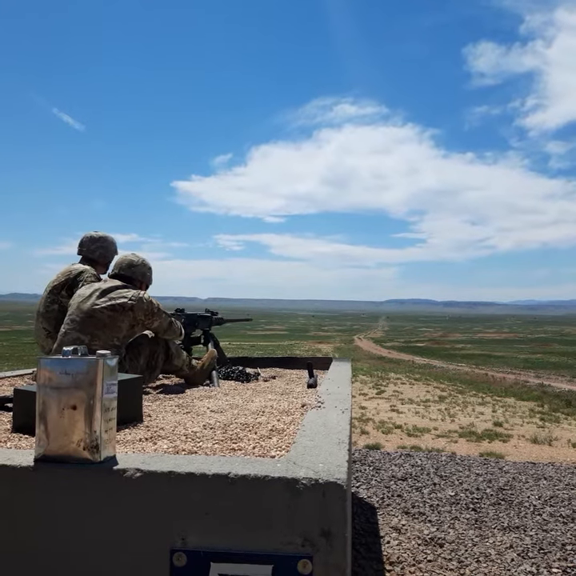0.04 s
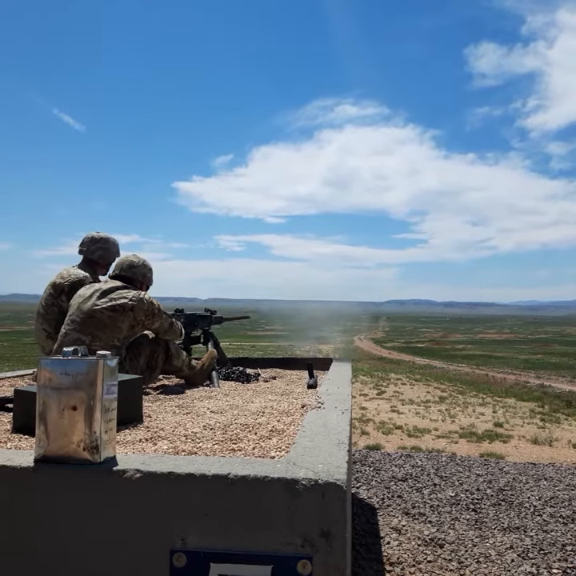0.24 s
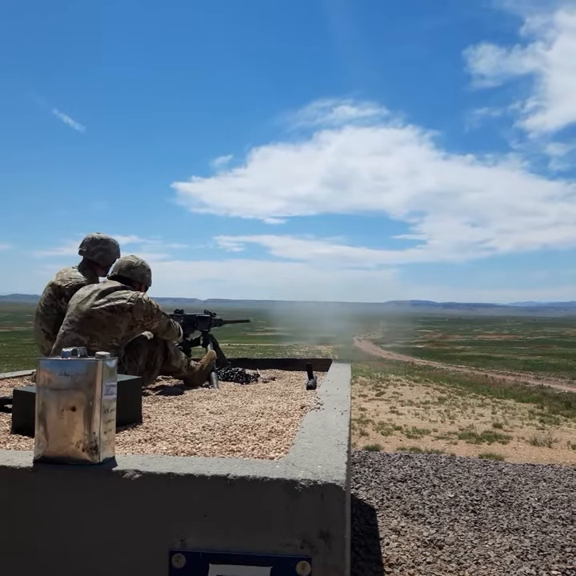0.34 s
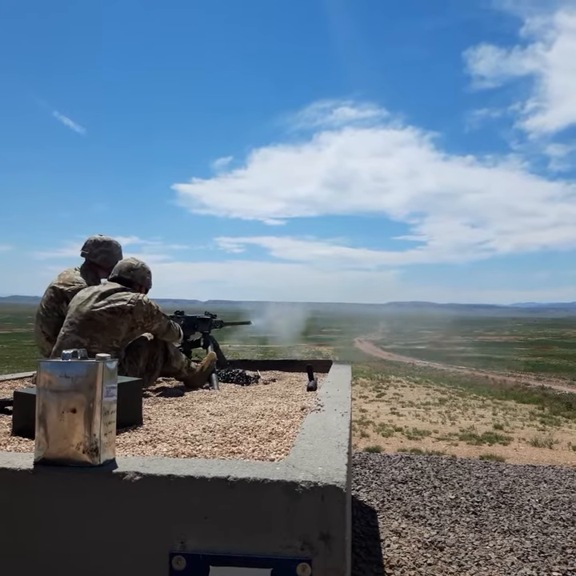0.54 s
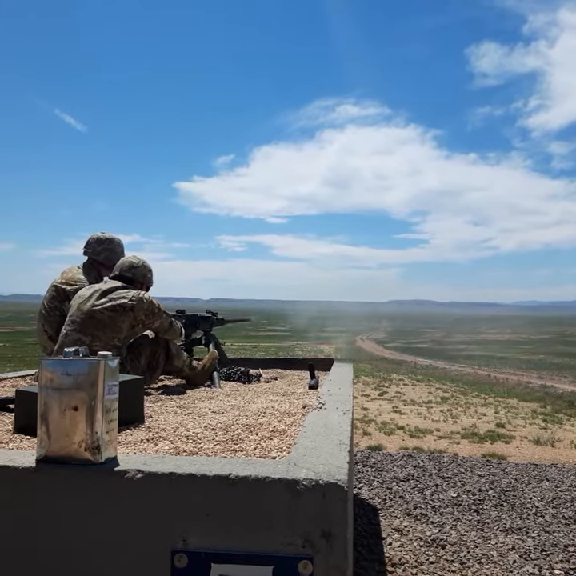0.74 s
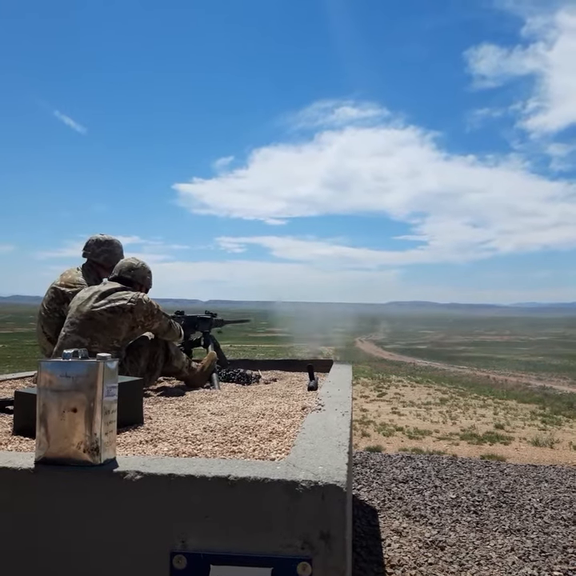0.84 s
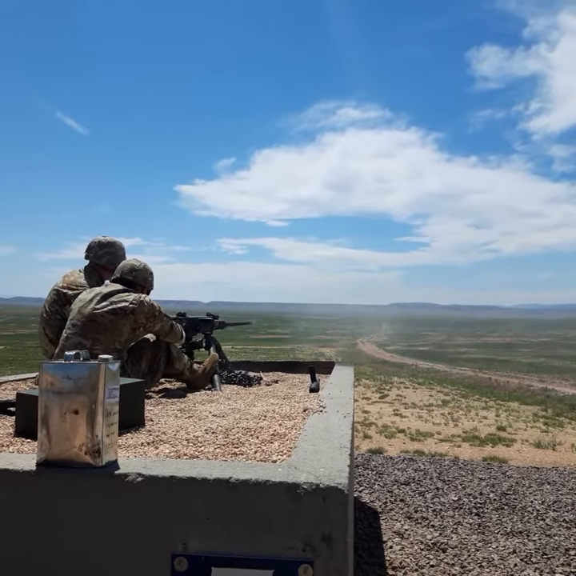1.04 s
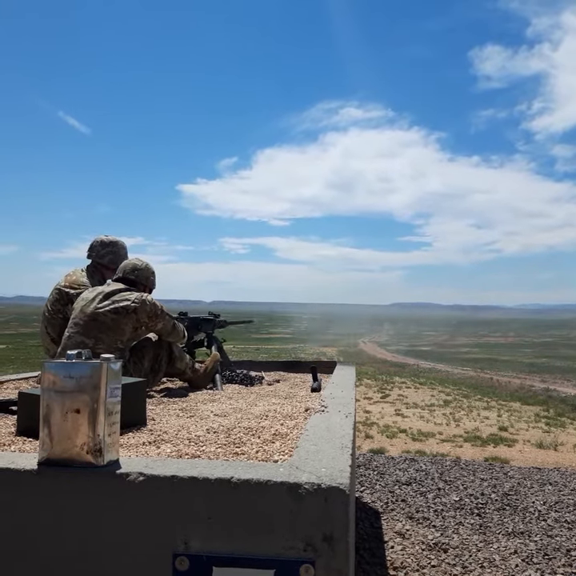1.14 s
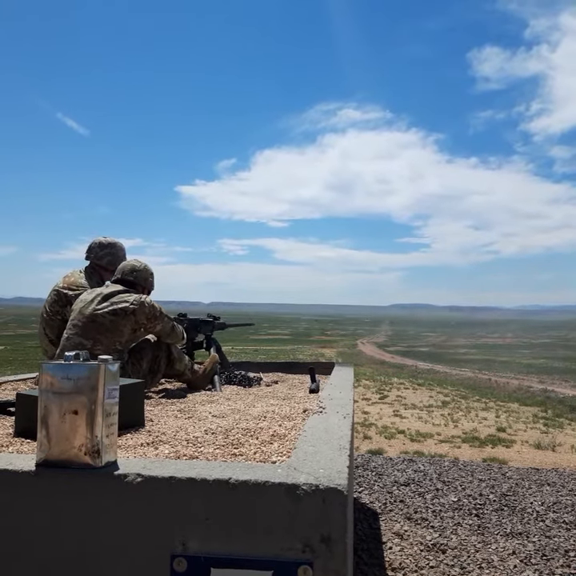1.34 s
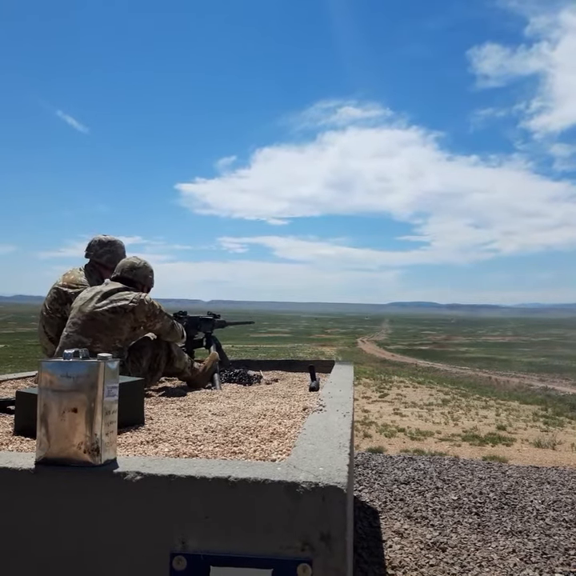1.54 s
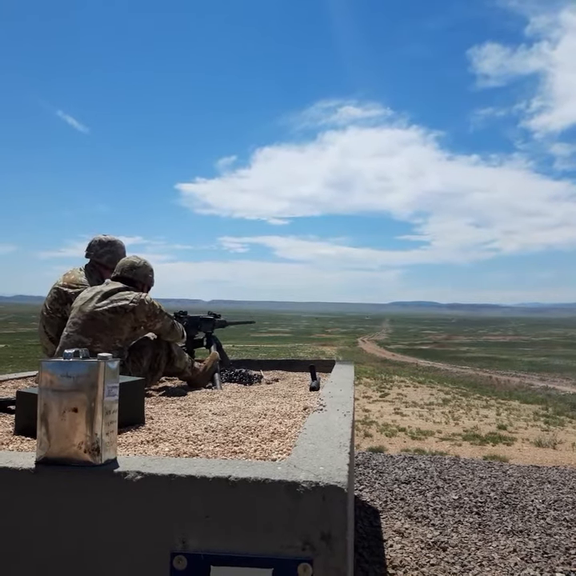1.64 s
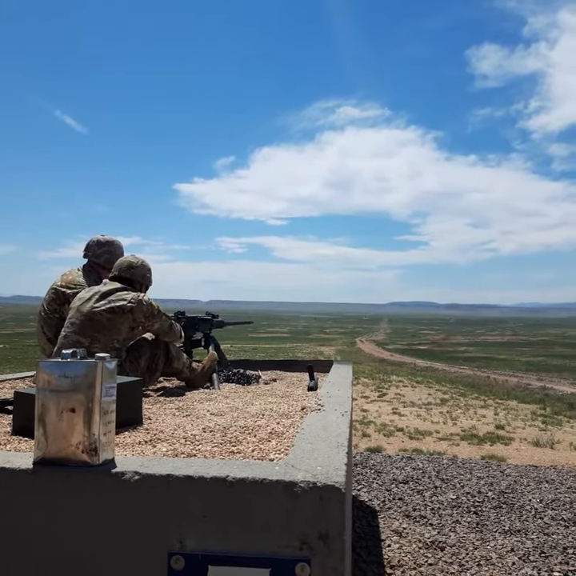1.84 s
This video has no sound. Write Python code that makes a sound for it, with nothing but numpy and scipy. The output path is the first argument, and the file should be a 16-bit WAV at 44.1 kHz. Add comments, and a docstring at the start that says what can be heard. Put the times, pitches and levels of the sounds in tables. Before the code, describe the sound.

A heavy machine gun on a concrete platform, close and loud outdoors. Faint low rumble and dull distant reports open the first 0.15 seconds. From 0.2 to 1.1 seconds, eight harsh, squashed blasts come about every 0.13 seconds, with metallic ringing and thumping echoes. A sharp action clack follows at 1.22, faint cases tinkle around 1.3 to 1.6, and the low roll fades over the plain.

```python
"""A low rumble over an open range, with dull reports from distant firing points, comes first.
Then a heavy machine gun fires eight rounds from a concrete platform: N-shaped shock fronts with
noise crashes, a clatter off the platform and a roll over the plain; metal modes ring, the bolt clacks.
Delayed pressure waves return as thumps from nearby structures, and cases and links tinkle down.
The stereo microphone signal is limited, its peaks are rounded and its top is cut."""
import sys
import numpy as np
from scipy import signal
from scipy.fft import rfft, irfft
from scipy.io import wavfile
from scipy.ndimage import uniform_filter1d, minimum_filter1d

SR = 44100
rng = np.random.default_rng(int(sys.argv[2]) if len(sys.argv) > 2 else 0)


def wav_out(sig):
    """Save sig, one row per channel (or a flat mono array), as 16-bit PCM at SR to the path in sys.argv[1]."""
    wavfile.write(sys.argv[1], SR, np.round(np.clip(np.atleast_2d(sig).T, -1, 1) * 32767).astype(np.int16))


N = 83790
T = np.arange(N) / SR  # s

# Distance: air over the range, noise colour [f/Hz, relative level/dB per Hz]
AIR_COLOUR = [(30, -25.5), (90, -3), (150, 9), (330, 1.5), (600, -13.5), (1400, -14.5), (2500, -23),
              (4000, -32.5), (15000, -41.5)]
AIR_BEFORE_DB, AIR_AFTER_DB = -49.5, -57.5
# Distance: reports from other firing points [t/s, level/dB]
FAR_REPORTS = [(.012, -33.5), (.078, -40), (.108, -27.5), (.128, -35), (1.868, -49)]
FAR_WAVE_MS, FAR_DULL_HZ = 2.63, 494

# Close: rounds of the gun [t/s, crash level/dB, clatter level/dB], levels on top of the layer levels
ROUNDS = [(.2052, 2.5, 4.5), (.3241, 0, 2.5), (.4399, 2, 3.5), (.5642, 1.5, 1.5), (.6893, 5, -1.5),
          (.8257, 3, -1), (.959, -2.5, -1.5), (1.0918, 5.5, -2.5)]
BOLT_LEAD_S, BOLT_DB, BOLT_DECAY_S = 0.0034, -21, .005  # the bolt closes just before each round
FRONT_DB, FRONT_MS, FRONT_DULL_HZ = 4, 0.6, 8200  # the direct shock front
# Close: harsh crash of the muzzle blast [f/Hz, relative level/dB per Hz, t60/s]
CRASH_COLOUR = [(60, -26.5, 0.18), (150, -13, .15), (268, -3.5, 0.19), (700, -3.5, 0.1), (1550, -5.5, 0.13),
                (2800, -1, 0.11), (5000, -2.5, 0.087), (7930, -3.5, 0.092), (9534, -13, 0.091),
                (15000, -9.5, 0.064)]
CRASH_DB, CRASH_ATTACK_S, CRASH_HOLD_S = 2, 0.000067, .005
# Close: clatter off the platform [f/Hz, relative level/dB per Hz, t60/s]
CLATTER_COLOUR = [(101, -21, 0.19), (505, 6, 0.18), (980, -1, 0.29), (1700, -5, .28), (2500, 1.5, 0.52),
                  (4570, -6, 0.6), (7600, -7, 0.52), (9900, -17.5, 0.16), (15000, -20, 0.17)]
CLATTER_DB, CLATTER_ATTACK_S, CLATTER_HOLD_S = -16, 0.013, 0.043
# Open ground: roll away over the plain [f/Hz, relative level/dB per Hz, t60/s]
ROLL_COLOUR = [(30.3, -29.5, 0.69), (67.7, -14, .9), (129, -12, 1), (240.7, 2, 0.8), (418, 2, 0.52),
               (602.6, -13, 1), (990, -19.5, 1), (2550, -18.5, 0.89), (4500, -30.5, 0.77),
               (15000, -65, 0.24)]
ROLL_DB, ROLL_ATTACK_S, ROLL_HOLD_S = -16.5, 0.016, 0.045
SAME_SHARE = 0.36  # share of the scatter's power that repeats from round to round
PATCHY_DB, PATCH_HZ = 1.5, 129  # reflections colour the scatter unevenly
GRAIN_DB, GRAIN_S = 3, 0.00078  # and make it crackle
# Close: bright spray of the bolt, the clacks, the ticks and the echoes [f/Hz, relative level/dB per Hz]
SPRAY_COLOUR = [(100, -25), (600, -1), (1300, -3.5), (2400, 5), (4500, -3.5), (8000, -5.5), (10000, -16.5),
                (15000, -15)]

# Close: ringing modes of the gun's body [f/Hz, level/dB, t60/s]
BODY_MODES = [(1315, 4.5, 0.18), (1820, 0, .25), (2240, -5, 0.4), (2620, 2, 0.35), (2910, -6, 0.1),
              (3800, -3, .3), (3870, 3, 0.25), (5173, 1, .2)]
BODY_DB = -20.5
# Close: clacks as the action settles [t/s, level/dB, decay to 1/e/s]
ACTION_CLACKS = [(1.223, -15.5, 0.0061), (1.413, -36, 0.0029), (1.457, -38.5, 0.0036)]
# On the ground: cases and links land [t/s, level/dB]
LANDINGS = [(1.275, -44.5), (1.352, -50.5), (1.497, -53.5)]
# On the ground: ringing modes of the cases and links [f/Hz, level/dB, t60/s]
BRASS_MODES = [(5722, -8.5, 0.52), (6140, -2, 0.2), (6470, -1, 0.22), (6750, -6.5, 0.17),
               (7327, -5.5, 0.52), (7600, -10.5, 0.61), (8140, -17, .35), (8839, -7.5, 0.28),
               (10800, -13, .4), (11300, -10, .3), (12800, -11, 0.46), (13900, -6, 0.37), (15070, -10, .3)]
BOUNCES, BOUNCE_GAP_S, BOUNCE_LOSS_DB = 4, (.01008, .0588), 3
TICK_DB, TICK_DECAY_S = 11, 0.0023  # contact tick, level above the landing's

# Nearby structures: return paths of every blast [delay t/s, thump level/dB, wave length/ms,
# dull above f/Hz, spray level/dB, spray decay to 1/e/s, lag of left behind right/ms]
RETURN_PATHS = [(.0441, 8.5, 2.5, 1000, -22, .004, 0.32), (.0512, 3, 3.6, 650, -28.5, .004, 0.29),
                (.0860, 0, 1.61, 1300, -10, .008, -0.15), (.0908, -3.5, 2.0, 1000, -19, .004, 0.38),
                (.0975, 4, 3.01, 700, -33, .005, 0.33), (.1375, -0.5, 2.4, 700, -25, .006, 0.13),
                (0.141, -5.5, 2.4, 700, -42, 0.0043, -0.05), (.1835, -3.5, 1.6, 680, -20, .004, 0.079),
                (0.272, -24.5, 1.1, 1200, -37.5, .004, 0), (.3120, -21, 1.5, 800, -46, .004, 0),
                (.3800, -17.5, 4.5, 280, -65.5, .005, 0.095), (.4030, -22, .8, 1200, -52, .005, 0),
                (.4180, -29, 2.7, 450, -71.5, .005, -0.052), (.5495, -17.5, 3.0, 330, -43.5, .007, 0.045),
                (.6090, -28, 3, 350, -82.5, .005, 0), (.6670, -46.5, 1.9, 400, -92.5, .005, -0.042)]
SPRAY_HZ_AT_1_S = 1400  # treble limit of an echo spray delayed by one second

# Microphone: left-right likeness of noise [f/Hz, correlation from -1 to 1]
LIKENESS_CURVE = [(100, 0.78), (280, 0.68), (550, 0.61), (1000, -0.35), (2200, 0.18), (5000, 0.14),
                  (12000, 0.13)]
# Microphone: balance of noise [f/Hz, left minus right level/dB]
BALANCE_CURVE = [(200, 2), (1000, -0.5), (3500, -2), (8000, -2), (13000, 2)]
LOW_CUT_HZ, BASS_LEAK_DB = 206, -16
BASS_HZ = 73.8  # the deep after-swing of each wave
LIMIT_DB, RELEASE_DB_PER_S, LIMIT_ATTACK_S = 2.44, 449, 0.00061
CEILING, TOP_CUT_HZ = 1.4, 15800  # ceiling as amplitude


def from_db(db):
    """Decibels to amplitude gain."""
    return 10 ** (np.asarray(db) / 20)


def at_hz(table, hz, axis=1):
    """Read a column of a table on a log-frequency axis."""
    table = np.array(table)
    return np.interp(np.log(hz + 1e-9), np.log(table[:, 0]), table[:, axis])


def butter(x, hz, kind, order=2):
    """Causal low- or high-pass."""
    sos = signal.butter(order, min(hz, SR * .45), kind, fs=SR, output="sos")
    return signal.sosfilt(sos, x + 1e-18)


def add(out, s, x):
    """Mix a sound in at time s, cut off at the end of the scene."""
    i = max(int(s * SR), 0)
    n = min(x.shape[-1], N - i)
    out[:, i:i + n] += x[..., :n]


def wander(x, step):
    """A random curve with a new value at every step of x, straight in between."""
    return np.interp(x / step, np.arange(4096), rng.standard_normal(4096))


def noise(colour, size, patchy_db=0, grain_db=0):
    """Coloured stereo noise of rms 1, alike in the bass and wide in the treble."""
    hz = np.fft.rfftfreq(size, 1 / SR)
    grain = from_db(grain_db * wander(T[:size], GRAIN_S))
    mid, side = rfft(rng.standard_normal((2, size)) * grain)
    alike = at_hz(LIKENESS_CURVE, hz)
    left_right = np.array([[1], [-1]])
    balance_db = left_right * at_hz(BALANCE_CURVE, hz) / 2
    gain = from_db(at_hz(colour, hz) + balance_db + patchy_db * wander(hz, PATCH_HZ))
    spectrum = np.sqrt(1 + alike) * mid + left_right * np.sqrt(1 - alike) * side
    x = irfft(gain * spectrum, size)
    return x / x.std()


def air():
    """A steady low rumble that falls in level while the gun fires."""
    level_db = np.interp(T, [ROUNDS[0][0], ROUNDS[-1][0]], [AIR_BEFORE_DB, AIR_AFTER_DB])
    return noise(AIR_COLOUR, size=N) * from_db(level_db)


def blast(ms, dull_hz, lag_ms=0):
    """An N-shaped pressure wave, dulled by its path, ringing in the microphone's low cut."""
    late_ms = np.maximum([[lag_ms], [-lag_ms]], 0)  # a negative lag delays the right side
    u = (T[:4096] * 1000 - late_ms) / ms
    n_wave = (1 - 2 * u) * ((u >= 0) & (u < 1))
    wave = butter(n_wave, dull_hz, "low", order=3)
    after_swing = butter(butter(wave, BASS_HZ, "low"), BASS_HZ, "high")
    return butter(wave, LOW_CUT_HZ, "high", order=4) + from_db(BASS_LEAK_DB) * after_swing


def far_reports():
    """Distant firing points: pressure waves with little treble left."""
    out = np.zeros((2, N))
    for s, db in FAR_REPORTS:
        add(out, s, from_db(db) * blast(FAR_WAVE_MS, FAR_DULL_HZ))
    return out


def burst(db, decay):
    """A short bright spray of noise that dies exponentially."""
    x = noise(SPRAY_COLOUR, size=4096)
    return from_db(db) * x * np.exp(-T[:x.shape[1]] / decay)


def bolt():
    """The bolt closes as a short spray of noise just before each round."""
    out = np.zeros((2, N))
    for s, _, _ in ROUNDS:
        add(out, s - BOLT_LEAD_S, burst(BOLT_DB, BOLT_DECAY_S))
    return out


def scatter(colour, attack, hold, size):
    """Dense reflections: they swell, hold, then die at a rate of their own in each octave."""
    t, hz = T[:size], np.fft.rfftfreq(size, 1 / SR)
    spectrum = rfft(noise(colour, size, PATCHY_DB, GRAIN_DB))
    centres = 62.5 * 2 ** np.arange(9)  # Hz
    out = 0
    for centre, pick in zip(centres, np.eye(len(centres))):
        # neighbouring bands cross-fade, so together they restore the whole spectrum
        band = irfft(spectrum * np.interp(hz, centres, pick), size)
        t60 = at_hz(colour, centre, axis=2)
        out = out + band * np.exp(-np.log(1000) * np.maximum(t - hold, 0) / t60)
    return out * np.minimum(t / attack, 1)


def crash():
    """The harsh muzzle blast close to the microphone."""
    return scatter(CRASH_COLOUR, CRASH_ATTACK_S, CRASH_HOLD_S, size=8192)


def clatter():
    """Reflections off the platform, slower to swell."""
    return scatter(CLATTER_COLOUR, CLATTER_ATTACK_S, CLATTER_HOLD_S, size=20480)


def roll():
    """The long low tail over the ground."""
    return scatter(ROLL_COLOUR, ROLL_ATTACK_S, ROLL_HOLD_S, size=40960)


def muzzle_blasts():
    """Each round: a shock front and three scatter layers, partly alike from round to round."""
    out = np.zeros((2, N))
    layers = [crash, clatter, roll]
    shared = [layer() for layer in layers]
    for s, crash_db, clatter_db in ROUNDS:
        add(out, s, from_db(FRONT_DB) * blast(FRONT_MS, FRONT_DULL_HZ))
        levels = (CRASH_DB + crash_db, CLATTER_DB + clatter_db, ROLL_DB)
        for layer, common, db in zip(layers, shared, levels):
            mixed = np.sqrt(SAME_SHARE) * common + np.sqrt(1 - SAME_SHARE) * layer()
            add(out, s, from_db(db) * mixed)
    return out


def struck(modes, size):
    """One blow on metal: each mode is a decaying sine with a random strength and phase per side."""
    t = T[:size]
    out = 0
    for hz, db, t60 in modes:
        gain = from_db(db + 3 * rng.standard_normal((2, 1)))
        ring = np.sin(2 * np.pi * (hz * t + rng.random((2, 1))))
        out = out + gain * ring * np.exp(-np.log(1000) * t / t60)
    return out


def gun_body():
    """Every round sets the steel of the gun ringing."""
    out = np.zeros((2, N))
    for s, _, _ in ROUNDS:
        add(out, s, from_db(BODY_DB) * struck(BODY_MODES, size=16384))
    return out


def echoes():
    """Every blast returns along the same paths, as a thump and a spray that dulls with delay."""
    out = np.zeros((2, N))
    for delay, db, ms, dull_hz, spray_db, decay, lag_ms in RETURN_PATHS:
        thump = from_db(db) * blast(ms, dull_hz, lag_ms)
        for s, _, _ in ROUNDS:
            spray = butter(burst(spray_db, decay), SPRAY_HZ_AT_1_S / delay, "low")
            add(out, s + delay, thump + spray)
    return out


def action_clacks():
    """The action clacks to rest in short sprays of noise."""
    out = np.zeros((2, N))
    for s, db, decay in ACTION_CLACKS:
        add(out, s, burst(db, decay))
    return out


def falling_metal():
    """Spent cases and links bounce at random gaps, each time ticking and ringing more softly."""
    out = np.zeros((2, N))
    for s, first_db in LANDINGS:
        for k in range(BOUNCES):
            db = first_db - BOUNCE_LOSS_DB * k
            add(out, s, from_db(db) * struck(BRASS_MODES, size=24576))
            add(out, s, burst(db + TICK_DB, TICK_DECAY_S))
            s = s + rng.uniform(*BOUNCE_GAP_S)
    return out


def scene():
    """The range, the gun, its echoes and the loose metal."""
    distance = air() + far_reports()
    gun = bolt() + muzzle_blasts() + gun_body()
    return distance + gun + echoes() + action_clacks() + falling_metal()


def limiter(x):
    """Peaks above the limit push both sides' gain down fast; it recovers at a steady dB rate."""
    peak_db = 20 * np.log10(np.abs(x).max(axis=0) + 1e-9)
    over = np.maximum(peak_db - LIMIT_DB, 0)
    release = RELEASE_DB_PER_S * T
    held = np.maximum.accumulate(over + release) - release
    width = max(int(LIMIT_ATTACK_S * SR), 1)
    gain_db = uniform_filter1d(minimum_filter1d(-held, width), width)
    return x * from_db(gain_db)


def record(dry):
    """A limiter holds the blasts down, peaks round off, the top is cut."""
    x = CEILING * np.tanh(limiter(dry) / CEILING)
    top_cut = signal.ellip(10, .2, 65, TOP_CUT_HZ, fs=SR, output="sos")
    return signal.sosfilt(top_cut, x)


dry = scene()
out = record(dry)
wav_out(out)
```